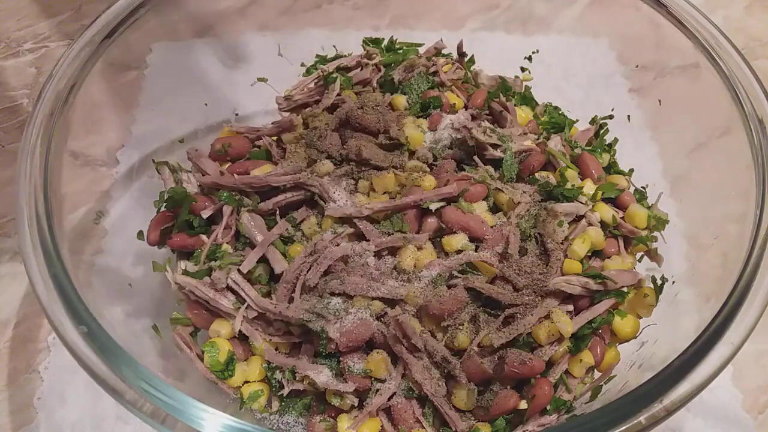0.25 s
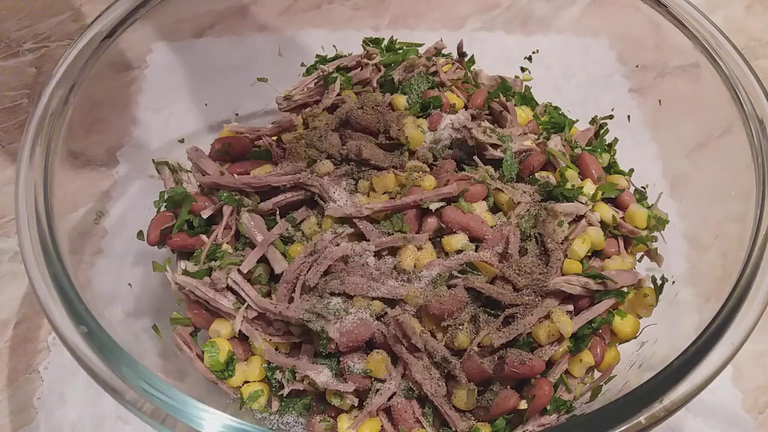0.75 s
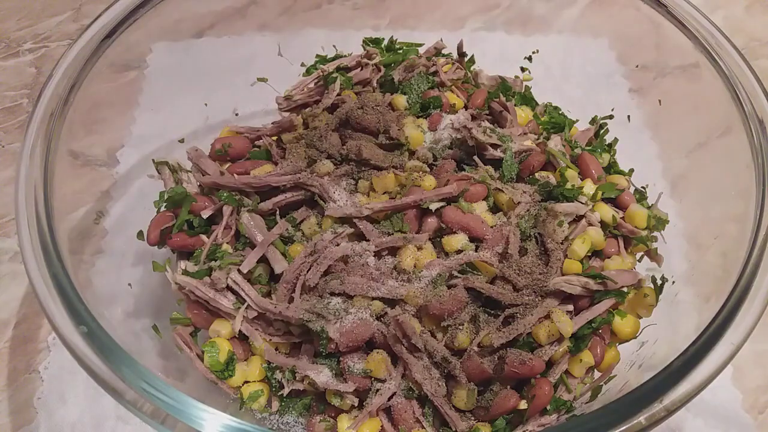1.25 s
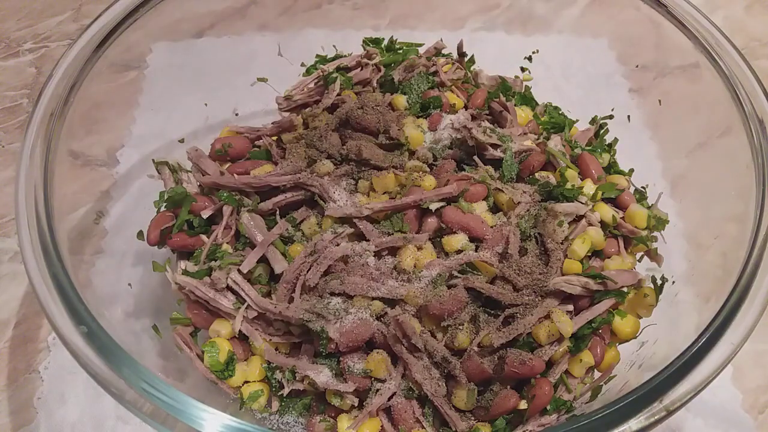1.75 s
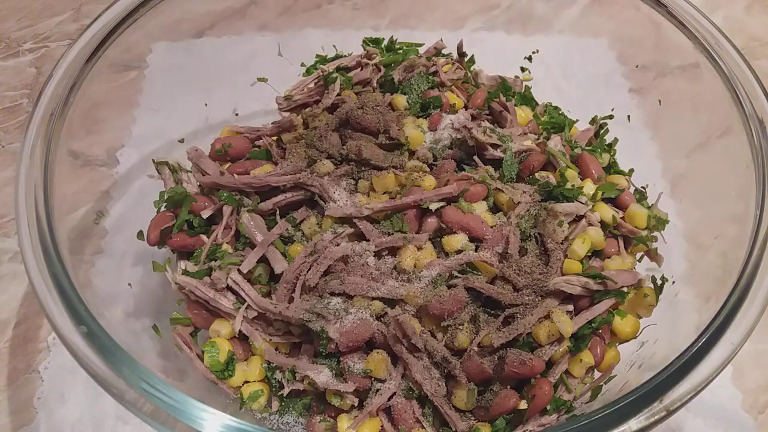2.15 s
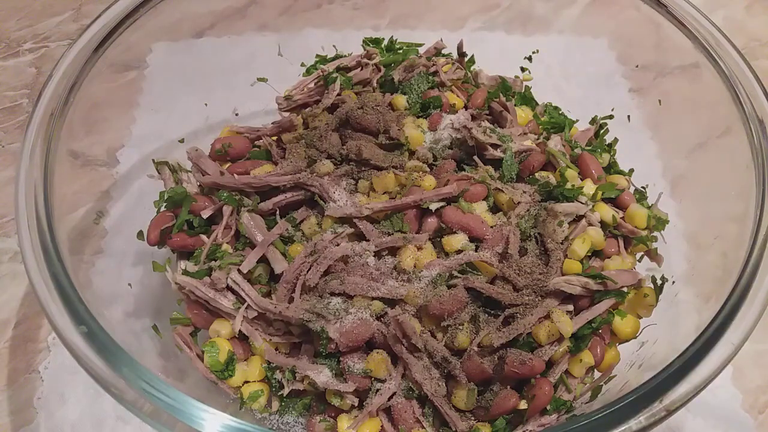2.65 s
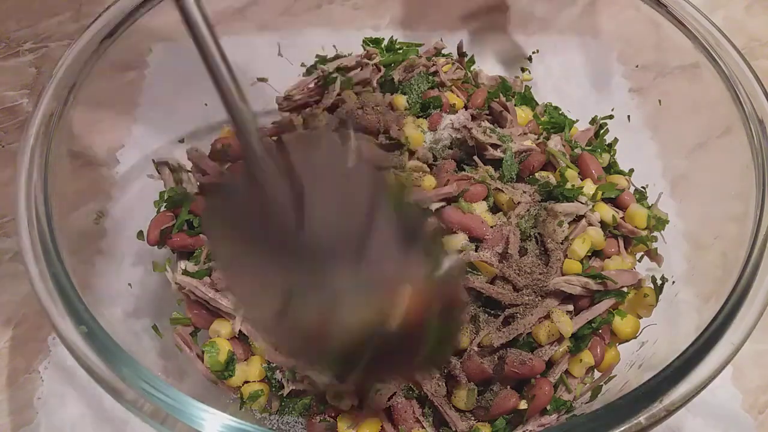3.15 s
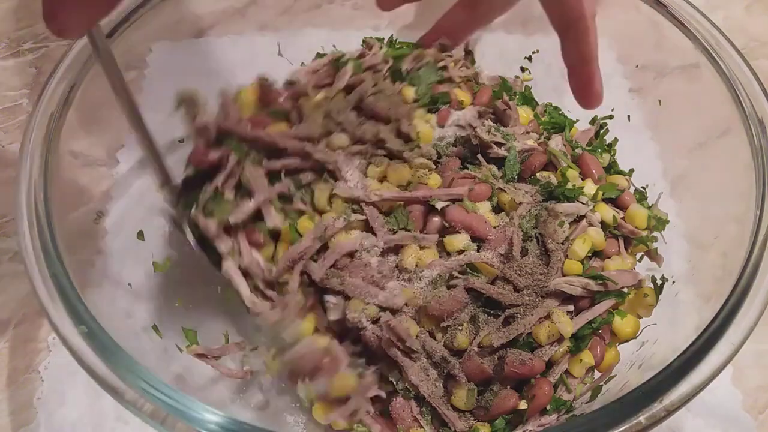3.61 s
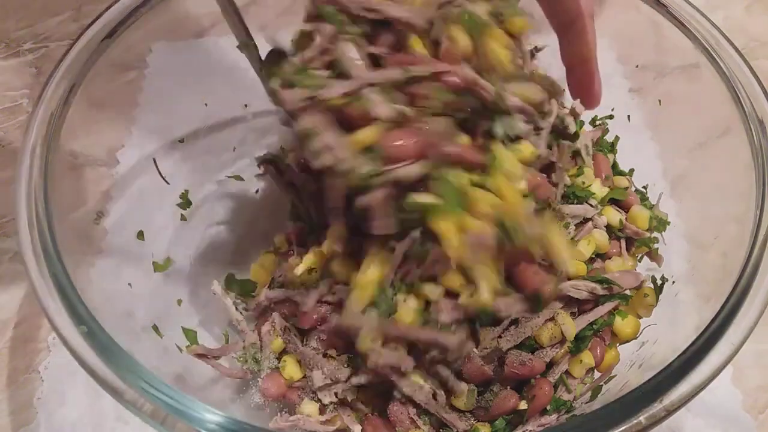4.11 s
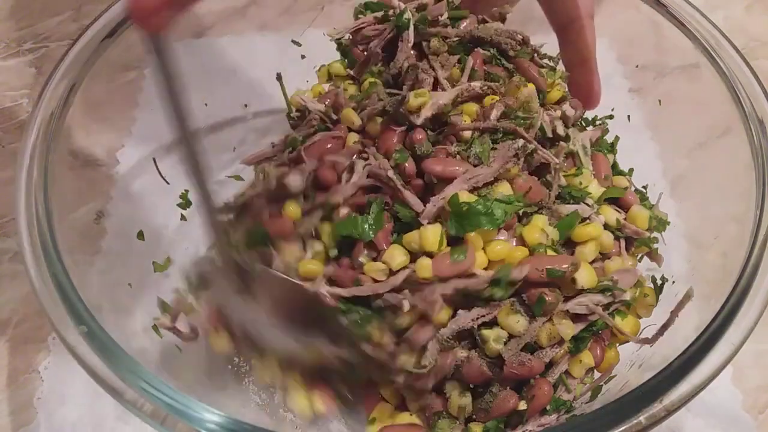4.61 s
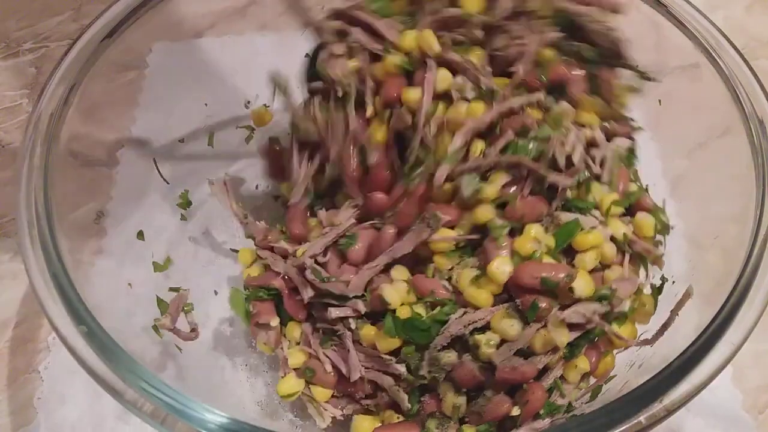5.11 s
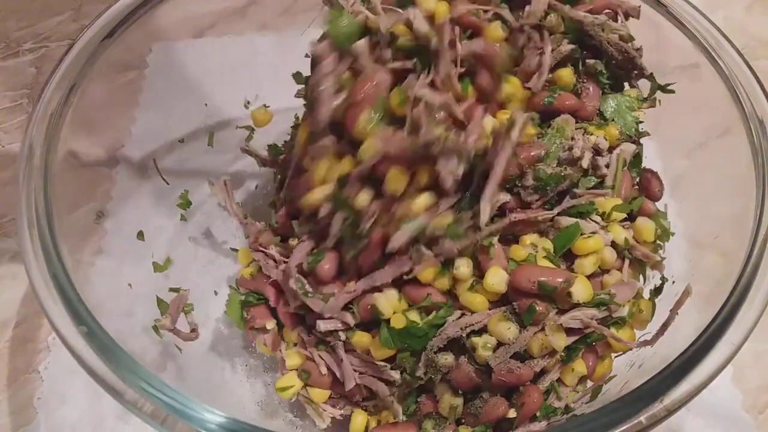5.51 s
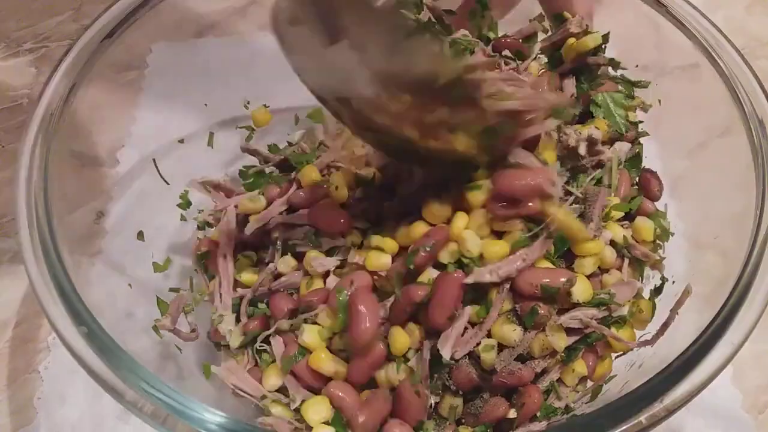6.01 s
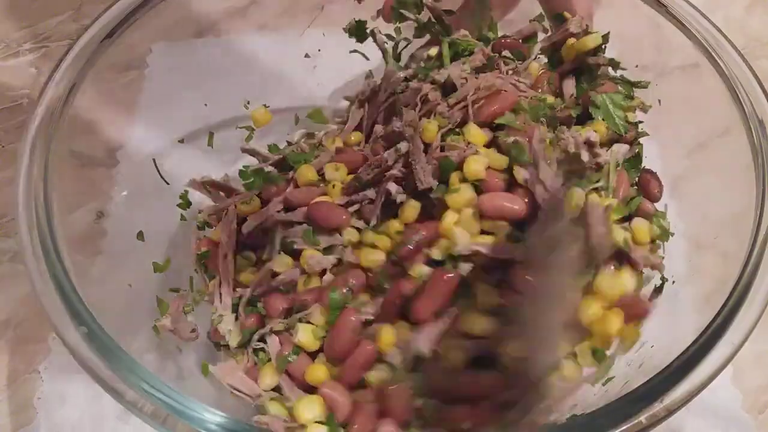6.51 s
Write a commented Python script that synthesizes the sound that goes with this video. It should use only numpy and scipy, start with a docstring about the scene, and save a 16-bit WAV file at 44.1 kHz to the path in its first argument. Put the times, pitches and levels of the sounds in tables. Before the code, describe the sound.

A faint, steady ventilation murmur fills a home kitchen. From about 0.7 seconds, a few steps away, a drawer rolls open with a low, uneven rumble. Its plastic tray clacks near 1.7 seconds, steel utensils clatter brightly at 2, and the drawer shuts with a wooden knock at 2.5, each with a short room reverberation.

Close by, a large steel spoon starts scraping a glass bowl just after 3 seconds and strikes it at 3.4 with a sharp, brief clink, the loudest sound. Lighter clinks and juddering scrapes follow until 3.7. The spoon turns a moist salad in four quiet scoops, starting around 3.4, 4.5, 5.5 and 6.5 seconds. The food shuffles dully, crackles wetly and falls back in soft plops, with small smacks, light scrapes and faint tings from the spoon, until about 7 seconds.

```python
"""Ventilation murmurs in a home kitchen. A few steps away a cutlery drawer rumbles open, steel utensils
clatter, and the drawer knocks shut. Close by, a large steel spoon scrapes and clinks in a glass bowl
and turns a moist salad of beans, corn and meat. Each hard impact is a brief force that excites the
damped modes of a body; scraping and wet crackle are sums of many tiny pulses. Cupboards and walls
add a short reverberation to the knocks and clinks."""
import sys
import numpy as np
from scipy import signal
from scipy.fft import rfft, irfft, next_fast_len
from scipy.io import wavfile
from scipy.ndimage import map_coordinates

SR = 44100
rng = np.random.default_rng(int(sys.argv[2]) if len(sys.argv) > 2 else 0)


def generate_wav(signal):
    """Clip the signal to [-1, 1] and save it as 16-bit WAV at the path in sys.argv[1]."""
    frames = np.transpose(np.atleast_2d(signal))
    scaled = np.clip(frames, -1, 1) * 32767
    pcm = np.round(scaled).astype(np.int16)
    wavfile.write(sys.argv[1], SR, pcm)


N = 298116
T = np.arange(SR // 2) / SR  # time within one blow [s]


def amp(db):
    """Amplitude grows tenfold for every 20 dB."""
    return 10 ** (np.asarray(db) / 20)


def unit(x):
    """Normalisation to rms 1."""
    return x / np.sqrt(np.mean(x ** 2) + 1e-20)


def along(points, hz):
    """Interpolation of (frequency [Hz], value) points on a logarithmic axis."""
    frequencies, values = np.transpose(points)
    return np.interp(np.log(hz + 1), np.log(frequencies), values)


def wobble(knots_per_s):
    """Slow random modulation: a spline through Gaussian values."""
    knots = rng.standard_normal(int(N * knots_per_s / SR) + 4)
    return map_coordinates(knots, [np.arange(N) * knots_per_s / SR])


def filtered(x, response):
    """Linear filtering multiplies the spectrum by a frequency response."""
    size = next_fast_len(len(x) + 8192)
    return irfft(rfft(x, size) * response(np.fft.rfftfreq(size, 1 / SR)), size)[:len(x)]


def slope(hz, tilt):
    """Spectral tilt [dB/octave] about 4 kHz: harder contacts are brighter."""
    return amp(tilt * np.log2(np.maximum(hz, 250) / 4000))


def coloured(x, spectrum):
    """Source and filter: x shaped by a spectral envelope, at rms 1."""
    return unit(filtered(x, lambda hz: amp(along(spectrum, hz))))


def noise(spectrum, size):
    """Coloured Gaussian noise of rms 1."""
    return coloured(rng.standard_normal(size), spectrum)


def fade(t60):
    """Exponential decay by 60 dB in t60 seconds."""
    return amp(-60 * T / t60)


def onset(rise_s):
    """Exponential approach to 1 with time constant rise_s."""
    return 1 - np.exp(-T / rise_s)


def stroke(start, length, rise_share, release_s):
    """Envelope of a hand movement: a linear rise to 1, a hold, then exponential release."""
    t = np.arange(N) / SR - start
    return np.clip(t / (rise_share * length), 0, 1) * np.exp(-np.maximum(t - length, 0) / release_s)


def ring(modes, tilt):
    """Modal superposition: damped sinusoids, their strengths varying a little from blow to blow."""
    hz, db, t60 = np.transpose(modes)
    gain = amp(db + rng.standard_normal(len(hz))) * slope(hz, tilt)
    phase = 2 * np.pi * (hz[:, None] * T + rng.random((len(hz), 1)))
    return gain / np.linalg.norm(gain) @ (np.sin(phase) * fade(t60[:, None])) * onset(0.001)


def burst(spectrum, envelope, tilt, snap):
    """Forced response: an impulse of size snap and a brief noisy force drive a body's spectrum."""
    hz = np.fft.rfftfreq(len(T), 1 / SR)
    gain = unit(amp(along(spectrum, hz)) * slope(hz, tilt))
    cepstrum = irfft(np.log(gain + 1e-6), len(T))
    fold = 1 + np.sign(np.fft.fftfreq(len(T)))  # minimum phase: nothing sounds before the contact
    force = snap * (T == 0) + rng.standard_normal(len(T)) * envelope
    return irfft(rfft(force) * np.exp(rfft(cepstrum * fold)), len(T))


def grains(per_s, spread_db, low_hz, high_hz, decay_cycles):
    """Shot noise of rms 1: tiny damped pops of random time, pitch and size."""
    when, pitch, strength = rng.random((int(per_s * N / SR), 3)).T[:, :, None]
    hz = low_hz * (high_hz / low_hz) ** pitch
    size = amp(spread_db * np.minimum(-np.log(1 - strength), np.pi))
    n = np.arange(SR // 200)
    cycles = hz * n / SR
    pops = size * np.sqrt(hz) * np.sin(2 * np.pi * cycles) * np.exp(-cycles / decay_cycles)
    positions = (when * N).astype(int) + n
    return unit(np.bincount(positions.ravel(), pops.ravel(), N)[:N])


def rattle(events, gap_s, settle_db, rebound_tilt, count):
    """Rebounds after impact: each blow is followed by further contacts that fade ever faster; every second one
    is brighter."""
    return [(s + k * gap_s, db - settle_db * k ** 2, tilt + rebound_tilt * (k % 2))
            for s, db, tilt in events for k in range(count)]


def play(events, sound):
    """Superposition of one fresh sound(colour) for each row of (time [s], level [dB], colour)."""
    out = np.zeros(N + SR)
    for s, db, colour in events:
        out[round(s * SR):][:len(T)] += amp(db) * sound(colour)
    return out[:N]


# reverberation time of the kitchen: (frequency [Hz], t60 [s])
ROOM_DECAY = [(150, 0.33), (1000, 0.24), (5000, 0.23), (14000, 0.2)]

def in_kitchen(blow, wet_db, build_s):
    """Reverberation: reflections from cupboards and walls build up, then decay, the treble first."""
    hz, t, spectra = signal.stft(rng.standard_normal(len(T)), SR, nperseg=256)
    decay = amp(-60 * t / along(ROOM_DECAY, hz)[:, None])
    tail = signal.istft(spectra * decay, SR, nperseg=256)[1][:len(T)] * onset(build_s)
    return blow + amp(wet_db) * signal.fftconvolve(blow, tail / np.linalg.norm(tail))[:len(T)]


# spectrum of the ventilation: (frequency [Hz], relative level [dB])
AIR_SPECTRUM = [(20, -22), (36, -27), (58, -1.5), (130, -5), (215, -2.5), (330, -7), (480, -14),
                (1000, -17), (2000, -23), (4400, -30.5), (7000, -35.5), (10000, -32.5), (13000, -31),
                (16000, -33)]

def ventilation():
    """Stationary broadband noise: moving air murmurs, strongest in the bass."""
    return amp(-62.5) * noise(AIR_SPECTRUM, N)


# drawer pulled open, then pushed shut: (time [s], duration [s], level [dB])
ROLLS = [(0.7, 1.096, -58.5), (2.38, 0.26, -64.5)]
# spectrum of the rumble: (frequency [Hz], relative level [dB])
ROLLER_SPECTRUM = [(40, -19), (95, 3), (150, 5.5), (280, -5), (500, -12.5), (850, -22), (1100, -9.5),
                   (1600, -28.5), (4000, -36.5), (16000, -44)]

def drawer_rollers():
    """Rolling noise: the rollers rumble unevenly, louder as the drawer gathers speed."""
    speed = sum(amp(db) * stroke(s, length, rise_share=0.75, release_s=0.12) for s, length, db in ROLLS)
    return noise(ROLLER_SPECTRUM, N) * speed * amp(wobble(21.8))


# utensils knocking in their tray: (time [s], level [dB], tilt [dB/octave])
TRAY_HITS = [(1.632, -54.5, -5), (1.697, -35.5, -2.5), (1.801, -52, -1.5), (1.914, -52, -4)]
# impact spectrum of the tray: (frequency [Hz], relative level [dB])
TRAY_SPECTRUM = [(60, -10), (160, -5), (280, -15), (480, -3.5), (720, 1), (950, -4.5), (1400, -3.5),
                 (1750, -5), (2100, 3), (3200, 0.5), (4200, -4), (8500, -7.5), (12000, -7), (14000, -20)]
# modes of the plastic tray: (frequency [Hz], relative level [dB], t60 [s])
TRAY_MODES = [(170, -8, .2), (640, 0, .11), (745, 0, .11), (1900, -6, .1), (2430, -4, .11), (2590, -1, .11),
              (2770, -1, .12), (3250, -1, .11), (5280, -4, .1), (7230, 1, .16), (8360, -3, .12),
              (10400, -3, .1)]

def tray_knocks():
    """Strongly damped modes give a hollow clack, heard mostly through the room's reflections."""
    def knock(tilt):
        clack = burst(TRAY_SPECTRUM, fade(0.025), tilt, snap=3.9)
        return in_kitchen(clack, wet_db=3.5, build_s=0.00092) + amp(-4.5) * ring(TRAY_MODES, tilt)
    return play(rattle(TRAY_HITS, gap_s=0.0095, settle_db=2.5, rebound_tilt=5, count=2), knock)


# steel on steel, a nudge and then the clatter: (time [s], level [dB], tilt [dB/octave])
CUTLERY_HITS = [(1.985, -53, -5.5), (2.051, -27.5, -1)]
# impact spectrum of the utensils: (frequency [Hz], relative level [dB])
STEEL_SPECTRUM = [(50, -4.5), (150, -1), (400, 2.5), (900, 2), (1450, 4), (1900, -2), (3200, 3.5),
                  (3700, 10), (5000, 5.5), (5600, -0.5), (7500, -5), (10000, -9), (12200, -9), (16000, -5)]
# modes of the utensils: (frequency [Hz], relative level [dB], t60 [s])
STEEL_MODES = [(1410, -10, .2), (2287, -9, .25), (2317, -2, .2), (3531, -2, .4), (3662, -6, .2),
               (3766, -5, .22), (4355, -4, .25), (4588, -5, .2), (4673, -2, .24), (4823, -4, .2),
               (4919, -2, .28), (5050, -4, .2), (5180, -6, .2), (5612, -10, .25), (6040, -9, .14),
               (6591, -9, .25), (7062, -8, .3), (8096, -7, .5), (8285, -6, .22), (9195, -10, .2),
               (9806, -2, .22), (9943, -5, .25), (10481, -8, .22), (11770, -11, .3), (11969, -5, .18)]

def cutlery_clatter():
    """Collisions excite bright inharmonic modes, which contact with neighbouring utensils soon damps."""
    def clash(tilt):
        crack = burst(STEEL_SPECTRUM, amp(-2) * fade(0.036), tilt, snap=2.7)
        ringing = ring(STEEL_MODES, tilt) * np.exp(-(T / 0.046) ** 2)
        return (in_kitchen(crack, wet_db=1.5, build_s=0.0056)
                + amp(-3) * in_kitchen(ringing, wet_db=-4.5, build_s=0.0042))
    return play(rattle(CUTLERY_HITS, gap_s=0.0125, settle_db=0.44, rebound_tilt=5, count=7), clash)


# drawer front touching, then meeting its frame: (time [s], level [dB], tilt [dB/octave])
FRONT_HITS = [(2.481, -55.5, 0.5), (2.546, -34.5, -0.5)]
# impact spectrum of the wooden front: (frequency [Hz], relative level [dB])
WOOD_SPECTRUM = [(50, -34.5), (150, 1), (350, -3.5), (550, 4.5), (800, 2), (1400, 0.5), (1700, -5.5),
                 (3000, -12), (5000, -19), (5700, -27), (9000, -32), (16000, -55)]
# modes of its panel: (frequency [Hz], relative level [dB], t60 [s])
WOOD_MODES = [(145, -5, .2), (318, -3, .18), (531, 1, .19), (605, -4, .13), (813, 0, .16), (1020, -7, .1),
              (1315, -4, .12), (1450, -7, .1)]

def drawer_shut():
    """Structure-borne vibration: the front thuds and rebounds, its panel rings, the cutlery shivers."""
    def knock(tilt):
        impact = burst(WOOD_SPECTRUM, amp(-3.5) * fade(0.013), tilt, snap=6)
        thud = in_kitchen(impact, wet_db=3.5, build_s=0.0056)
        shiver = ring(STEEL_MODES, tilt=-3) * fade(0.5) * onset(0.012)
        return thud + amp(-2.5) * ring(WOOD_MODES, tilt) + amp(-14) * shiver
    return play(rattle(FRONT_HITS, gap_s=0.021, settle_db=4.8, rebound_tilt=2.5, count=3), knock)


# spoon edge sliding on glass: (time [s], duration [s], level [dB])
SLIDES = [(3.15, 0.041, -70.5), (3.237, 0.033, -59), (3.417, 0.055, -61.5), (3.573, 0.1, -60),
          (3.74, 0.17, -74.5), (4.725, 0.084, -70), (4.912, 0.12, -68.5), (6.6, 0.1, -73)]

def spoon_scrape():
    """Sliding friction: the edge grinds along the bowl's wall in countless small slips."""
    pressure = sum(amp(db) * stroke(s, length, rise_share=0.79, release_s=0.045)
                   for s, length, db in SLIDES)
    edge_spectrum = [(1000, -5), (1700, -2), (2800, 4.5), (3600, -1.5), (4500, 2), (6600, -8),
                     (8500, -1.5), (16000, -4)]
    grit = grains(per_s=6000, spread_db=2, low_hz=1200, high_hz=15500, decay_cycles=6)
    return coloured(grit, edge_spectrum) * pressure


# spoon striking the bowl: (time [s], level [dB], tilt [dB/octave])
BOWL_HITS = [(3.294, -47.5, -2), (3.360, -18.5, 1.5), (3.430, -50, -2.5), (3.481, -48, 9), (3.499, -49, 6),
             (3.614, -46, 16), (3.671, -39.5, 13), (3.694, -50, 8), (3.713, -54, 10), (5.174, -58, 2),
             (5.192, -58, 1.5)]
# impact spectrum of the bowl: (frequency [Hz], relative level [dB])
GLASS_SPECTRUM = [(80, -6.5), (400, 6), (650, -2.5), (1400, 0), (2800, -2), (3300, 7.5), (4700, -3.5),
                  (5600, 3), (6700, -9), (7400, 3.5), (10200, 3.5), (12400, -2.5), (13700, -2), (15000, -9)]
# modes of the bowl with the spoon on it: (frequency [Hz], relative level [dB], t60 [s])
GLASS_MODES = [(415, -1, .24), (1094, -9, .32), (2039, -5, .36), (2622, -11, .09), (3193, 0, .19),
               (3290, -2, .08), (4587, -11, .18), (6131, -5, .16), (7224, -5, .16), (7337, -5, .15),
               (7660, -3, .1), (8520, -2, .1), (8829, -7, .14), (9200, -5, .15), (9740, -3, .09),
               (10218, -3, .16), (10276, -3, .17), (10990, -3, .08), (12070, -4, .16), (12189, -5, .15)]

def bowl_clinks():
    """A hard contact excites high modes; damping by food and table keeps the ring brief."""
    def clink(tilt):
        crack = burst(GLASS_SPECTRUM, amp(-1.5) * fade(0.035), tilt, snap=2.1)
        return in_kitchen(crack, wet_db=-12, build_s=0.00203) + amp(-11) * ring(GLASS_MODES, tilt)
    return play(BOWL_HITS, clink)


# scoops through the salad: (time [s], duration [s], shuffle level [dB], crackle level [dB])
SALAD_SCOOPS = [(3.38, 0.44, -64.5, -70.5), (4.53, 0.71, -69, -74), (5.45, 0.63, -72, -81.5),
                (6.45, 0.28, -68, -78)]
# spectrum of soft food: (frequency [Hz], relative level [dB])
FOOD_SPECTRUM = [(50, -15), (120, -2.5), (220, -1.5), (340, 5), (480, -10), (650, -5), (1100, -13),
                 (2000, -25.5), (5000, -34), (16000, -65)]

def salad_turning():
    """Many small contacts add up to noise: beans and meat shuffle dully as their wet surfaces crackle."""
    starts, lengths, shuffle_db, crackle_db = np.transpose(SALAD_SCOOPS)
    effort = np.array([stroke(s, length, rise_share=0.27, release_s=0.19)
                       for s, length in zip(starts, lengths)])
    wet_spectrum = [(1500, -11.5), (3000, -9), (6800, -10), (8400, -0.5), (10200, -2.5), (11500, -4),
                    (13500, -0.5), (16000, -6)]
    pops = grains(per_s=5000, spread_db=2.8, low_hz=1815, high_hz=15300, decay_cycles=15)
    crackle = coloured(pops, wet_spectrum) * amp(2.6 * wobble(30))
    shuffle = noise(FOOD_SPECTRUM, N) * amp(3.2 * wobble(25))
    return shuffle * (amp(shuffle_db) @ effort) + crackle * (amp(crackle_db) @ effort)


# spoon edge catching and jumping: (time [s], level [dB], nominal pitch [Hz])
EDGE_SLIPS = [(3.499, -44.5, 2280), (3.601, -47.5, 1560), (3.648, -45, 1550), (3.659, -39.5, 1556),
              (3.671, -41.5, 1630)]

def spoon_judder():
    """Stick-slip friction: each time the edge lets go, it chirps for a few cycles."""
    partials = [(0.88, -7), (1.02, 5.5), (1.42, -2.5), (1.8, -3)]  # (frequency ratio, level [dB])
    def slip(pitch_hz):
        chirp = sum(amp(db) * np.sin(2 * np.pi * ratio * pitch_hz * T) for ratio, db in partials)
        rasp = amp(-5.5) * noise(GLASS_SPECTRUM, len(T))
        return in_kitchen((chirp + rasp) * fade(0.014) * onset(0.00076), wet_db=-11, build_s=0.004)
    return play(EDGE_SLIPS, slip)


# spoonfuls dropping back: (time [s], level [dB], tilt [dB/octave])
FOOD_DROPS = [(3.828, -56.5, 1.5), (3.945, -54, -4.5), (4.060, -53, -4.5), (4.097, -49.5, -3.5),
              (4.347, -52.5, -3), (5.238, -50, 0.5), (5.678, -53, -3), (5.895, -54.5, -1),
              (6.710, -60, 3.5)]

def food_plops():
    """Inelastic impact: soft food lands on soft food with a dull thud and no ring."""
    landings = rattle(FOOD_DROPS, gap_s=0.012, settle_db=3, rebound_tilt=1, count=2)
    return play(landings, lambda tilt: burst(FOOD_SPECTRUM, amp(-4.5) * fade(0.092), tilt, snap=8.8))


# moist pieces parting: (time [s], level [dB], centre frequency [Hz])
FILM_BREAKS = [(3.911, -58, 11200), (4.944, -57.5, 6650), (5.112, -61, 2800), (6.064, -59.5, 8400),
               (6.193, -65.5, 8500)]

def dressing_smacks():
    """Rupture of a liquid film: the dressing snaps in a short pulse of band-limited noise."""
    def smack(centre_hz):
        band = [(centre_hz / 4, -24), (centre_hz, 0), (centre_hz * 2, -18)]
        return in_kitchen(noise(band, len(T)) * fade(0.016), wet_db=-7, build_s=0.003)
    return play(FILM_BREAKS, smack)


# faint rings of the spoon: (time [s], level [dB], tilt [dB/octave])
SPOON_TINGS = [(4.285, -72, 2), (4.32, -65, 5), (4.581, -64, 6), (4.63, -65, 8), (4.80, -65, -12),
               (4.85, -66, -20), (5.195, -64, -15), (5.934, -65, -1), (5.985, -61.5, -3), (6.70, -65, -14)]
# modes of the spoon alone: (frequency [Hz], relative level [dB], t60 [s])
SPOON_MODES = [(3530, -12, 0.086), (3850, -15, .08), (8330, 1, 0.23), (8300, -4, 0.12), (8830, -5, 0.11),
               (9950, -3, 0.21), (10200, -5, 0.12), (11800, -2, 0.11), (13520, -4, .13)]

def spoon_tings():
    """Modal vibration: the spoon rings faintly as it moves through the food or scrapes the bowl."""
    return play(SPOON_TINGS, lambda tilt: ring(SPOON_MODES, tilt) * onset(0.0016))


def scene():
    """Sound pressures add: spoon, food, drawer and ventilation sum in one channel."""
    spoon = bowl_clinks() + spoon_judder() + spoon_tings() + spoon_scrape()
    food = salad_turning() + dressing_smacks() + food_plops()
    air = ventilation()
    drawer = drawer_rollers() + tray_knocks() + cutlery_clatter() + drawer_shut()
    return (air + drawer + spoon + food)[None]


def record(dry):
    """Band-pass response: the microphone sheds the deepest bass and passes nothing above its limit."""
    bass_hz, top_hz = 36, 15860
    def response(hz):
        low_cut = hz ** 2 / np.hypot(hz ** 2, bass_hz ** 2)
        high_cut = np.clip((top_hz - hz) / 400 + 0.5, 0, 1)
        return low_cut * high_cut
    return np.array([filtered(channel, response) for channel in dry])


dry = scene()
out = record(dry)
generate_wav(out)
```